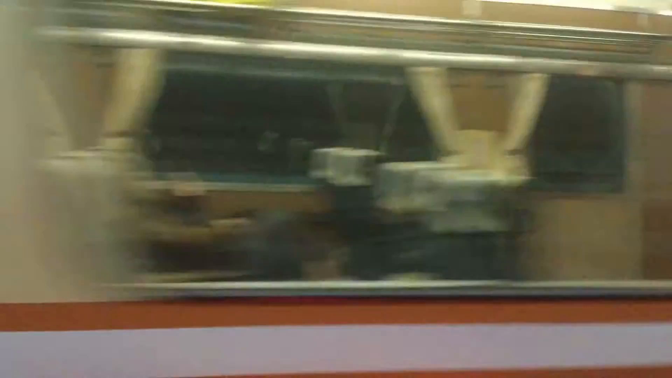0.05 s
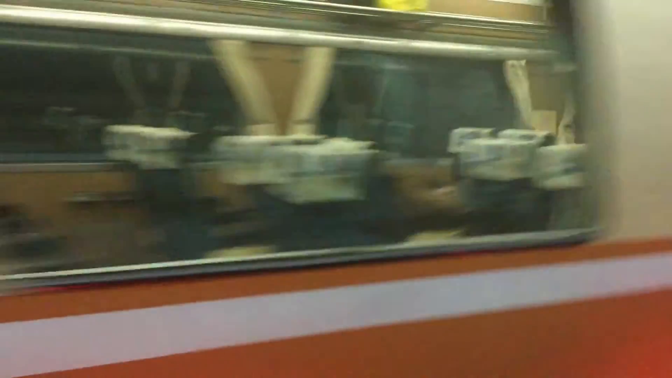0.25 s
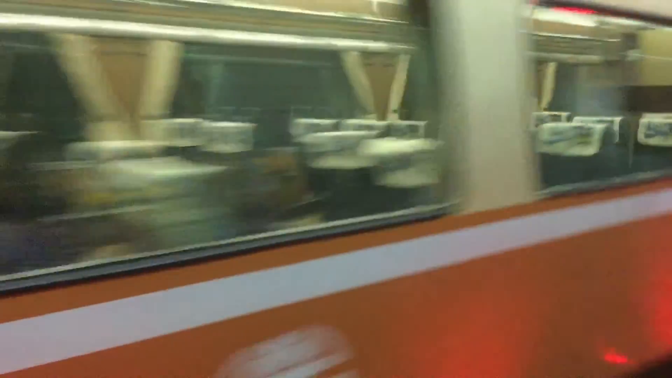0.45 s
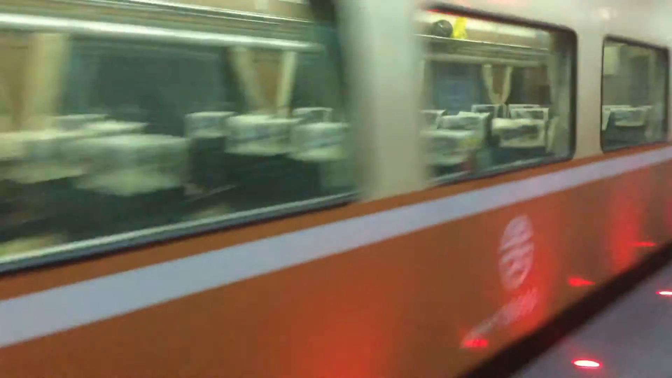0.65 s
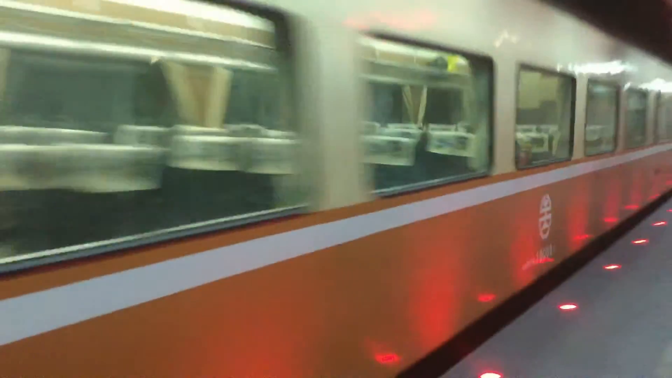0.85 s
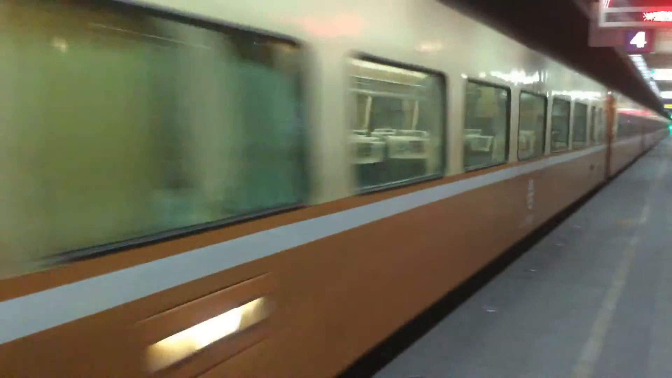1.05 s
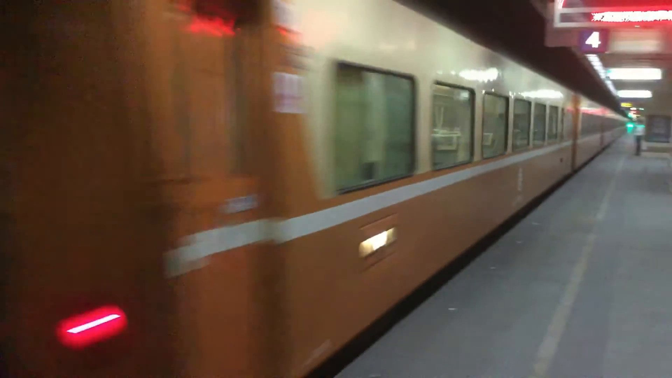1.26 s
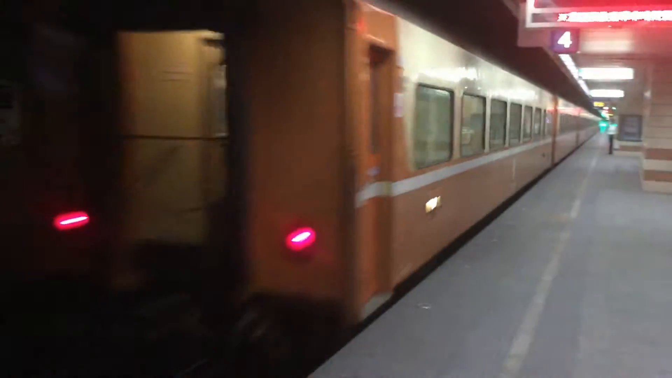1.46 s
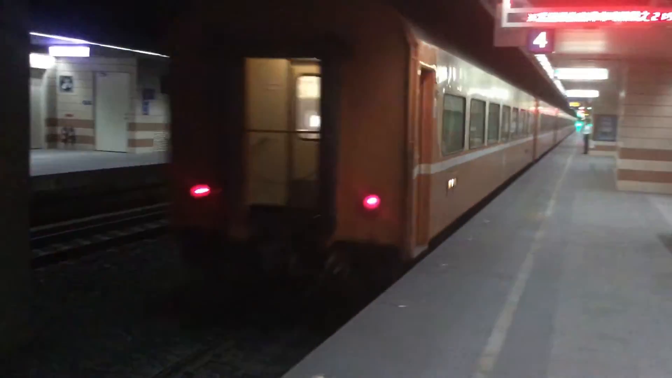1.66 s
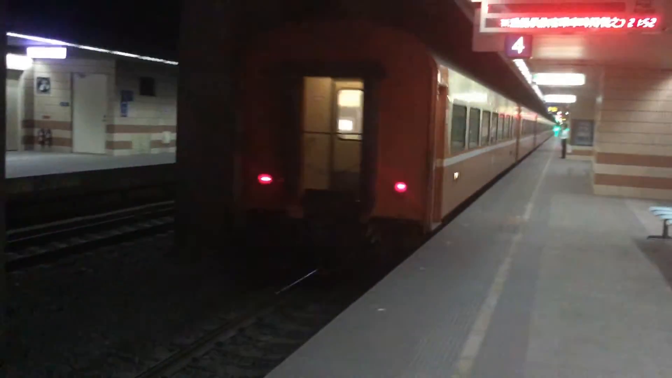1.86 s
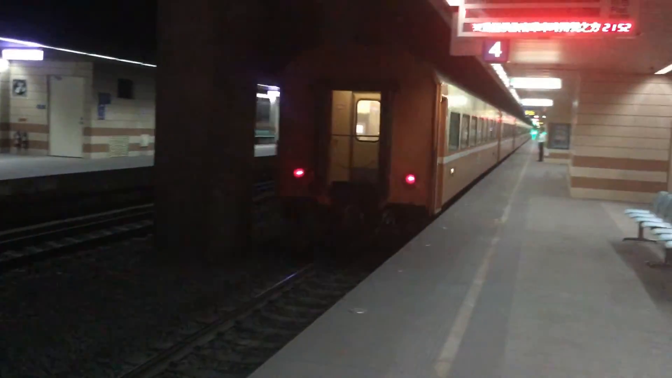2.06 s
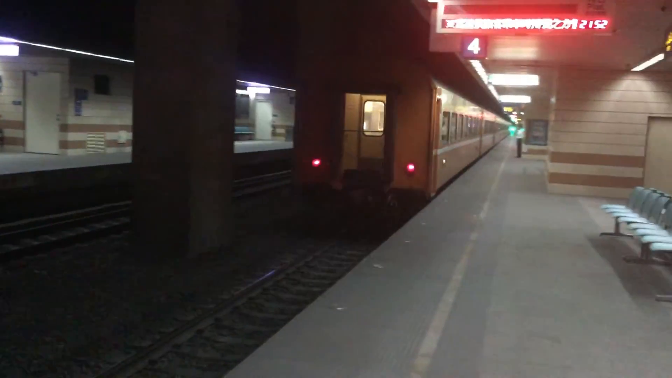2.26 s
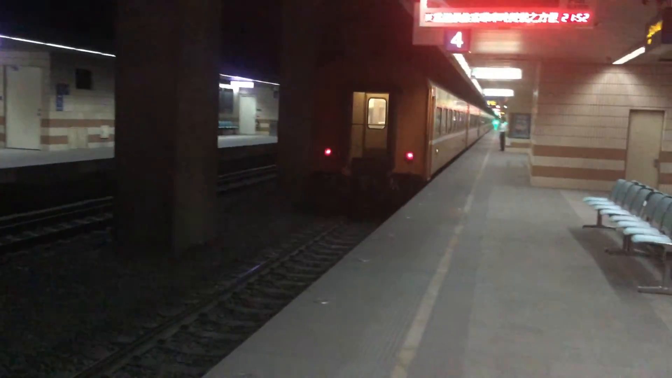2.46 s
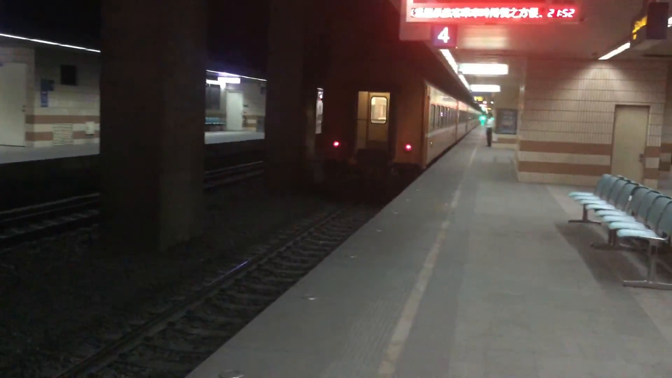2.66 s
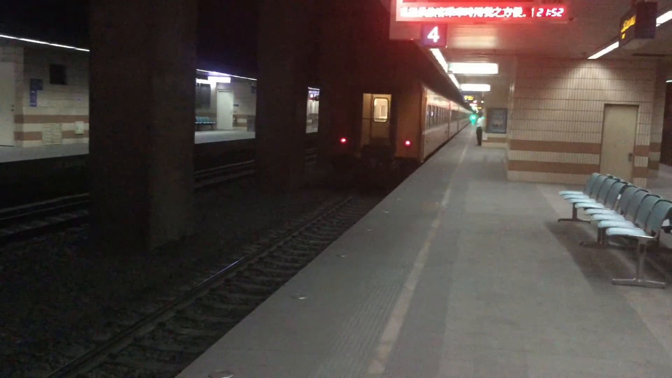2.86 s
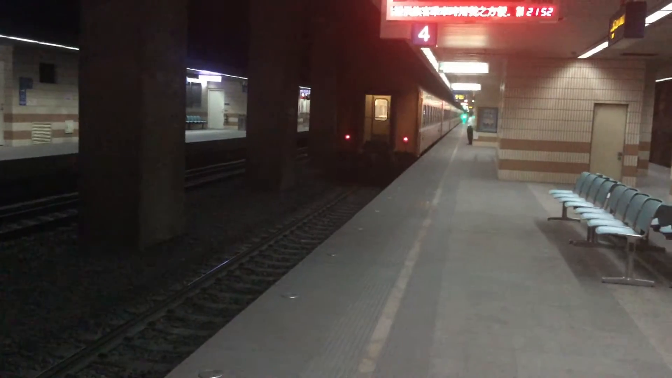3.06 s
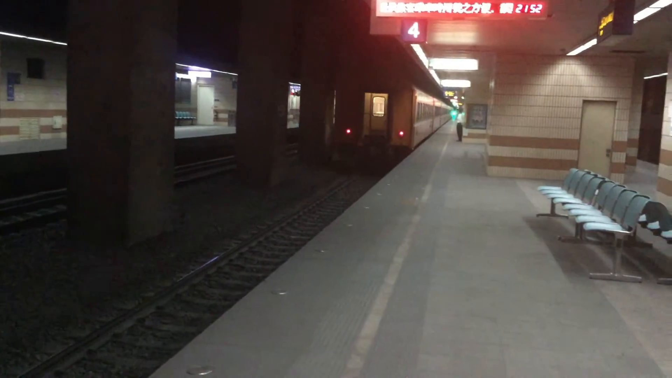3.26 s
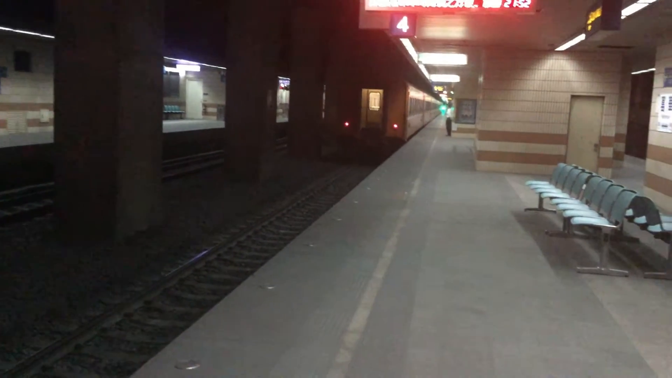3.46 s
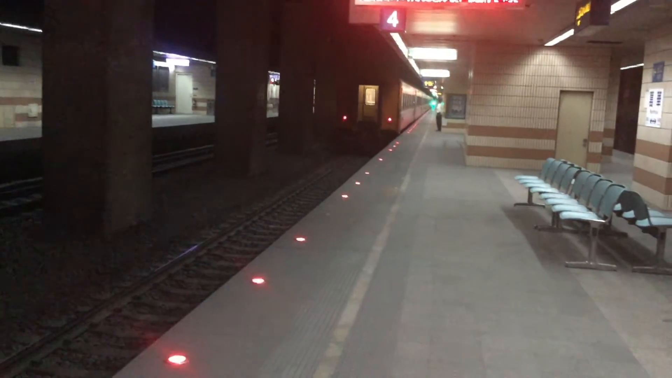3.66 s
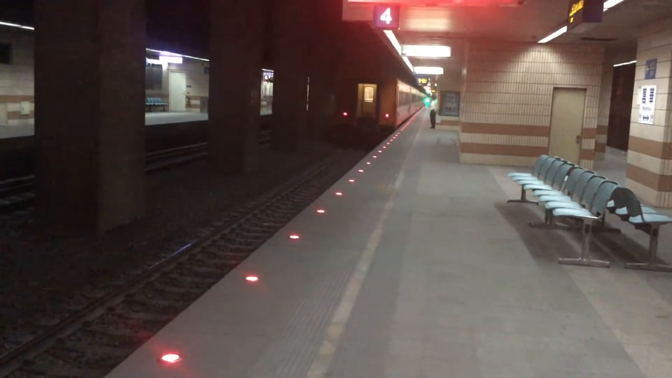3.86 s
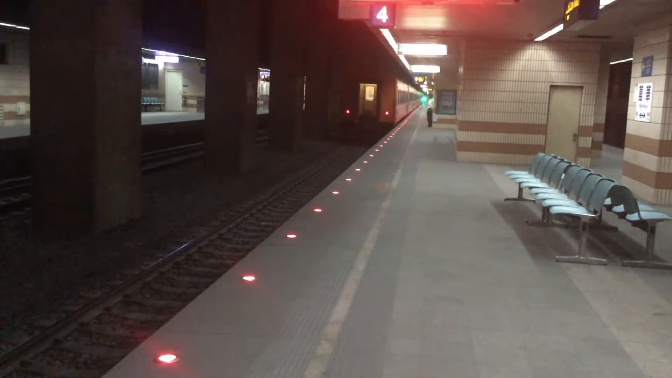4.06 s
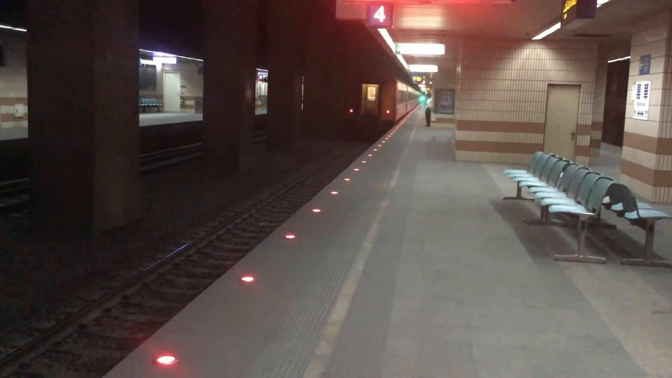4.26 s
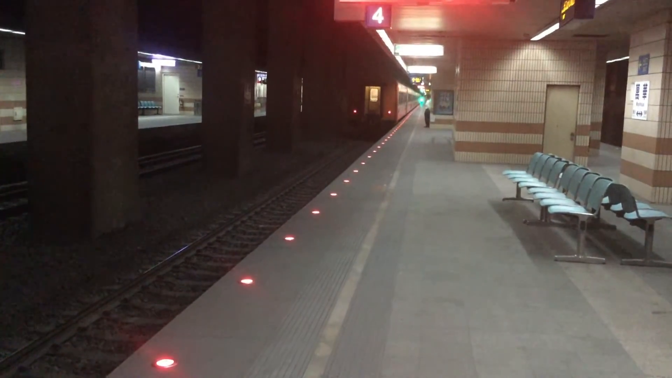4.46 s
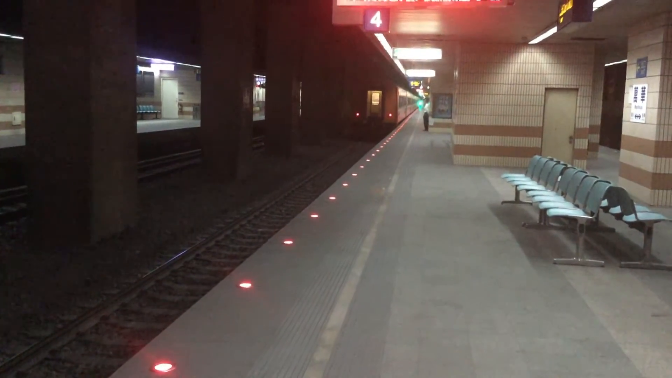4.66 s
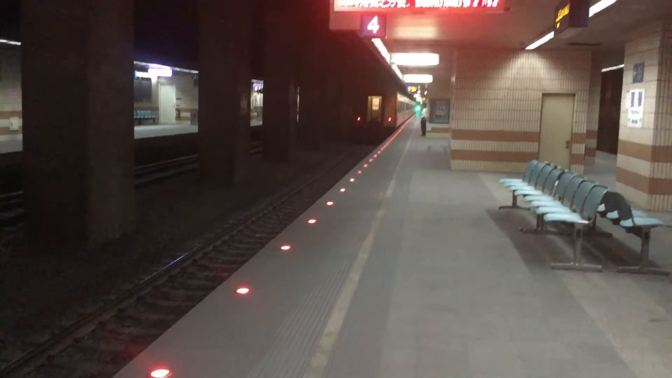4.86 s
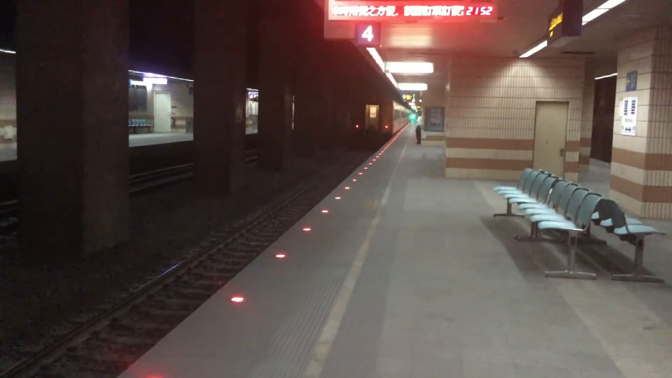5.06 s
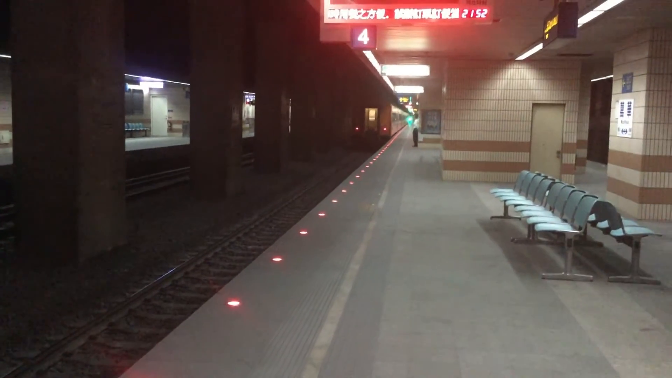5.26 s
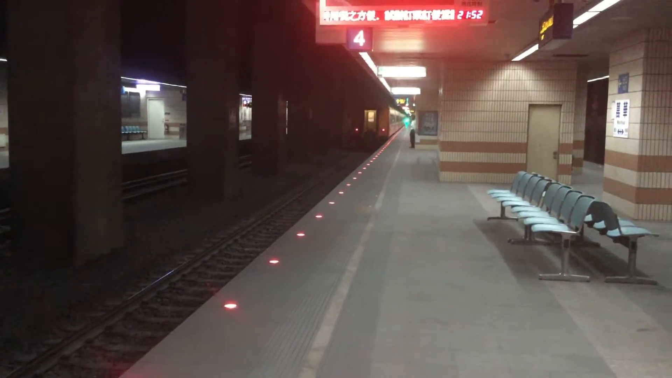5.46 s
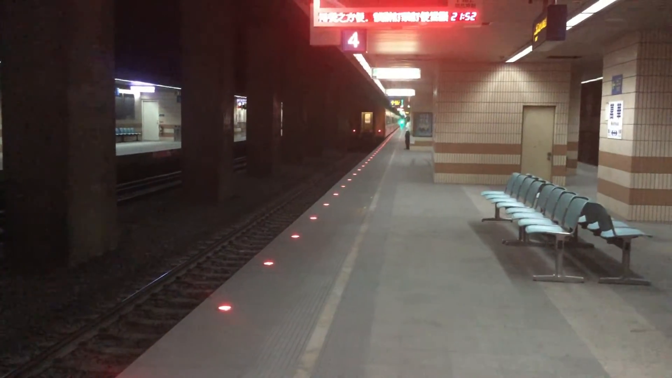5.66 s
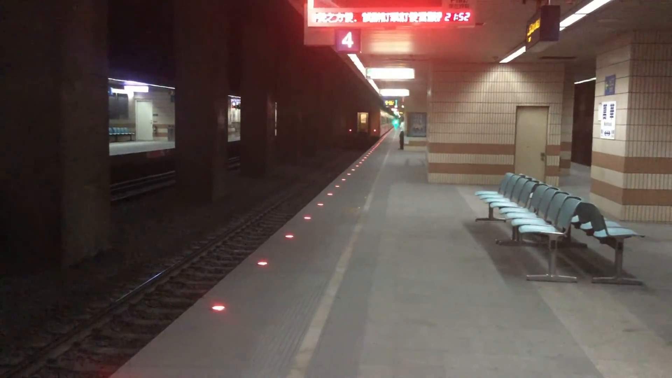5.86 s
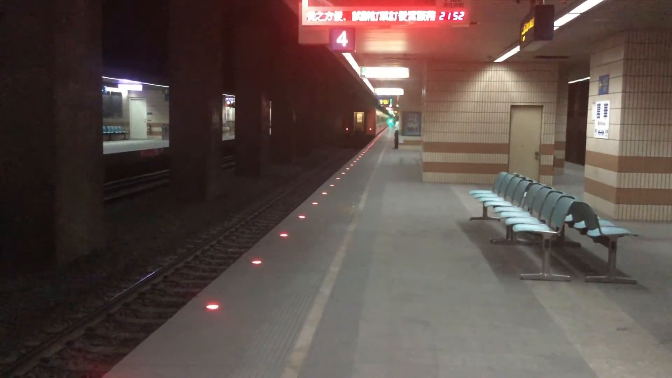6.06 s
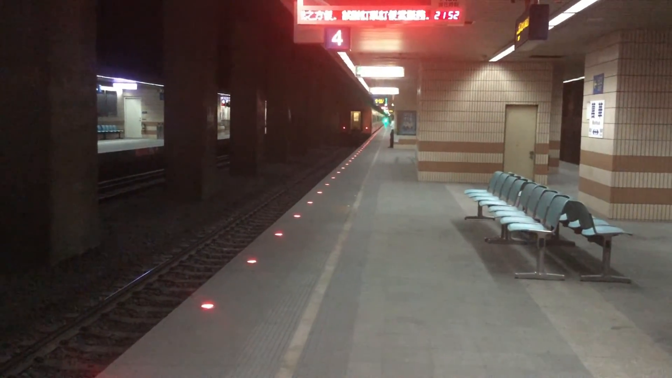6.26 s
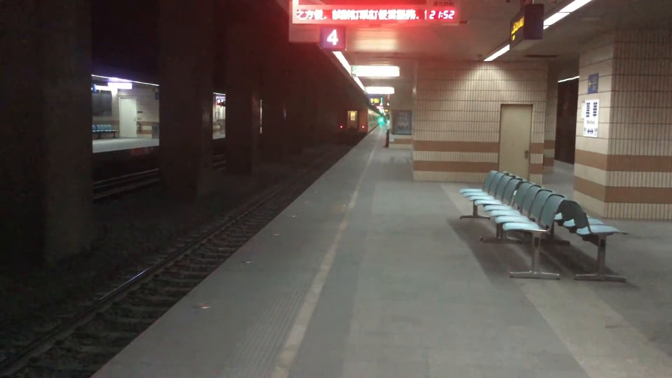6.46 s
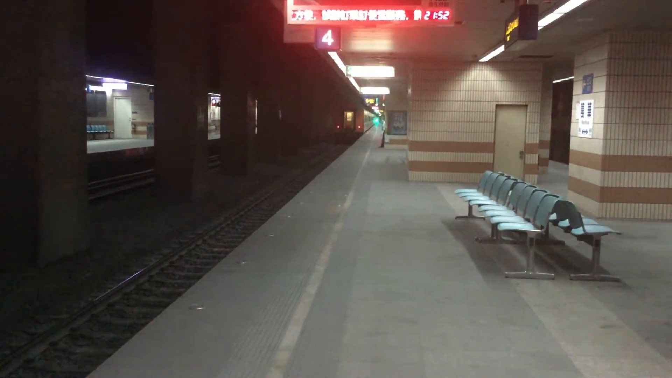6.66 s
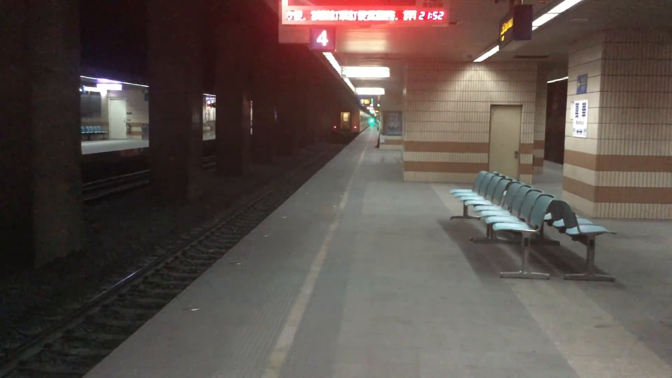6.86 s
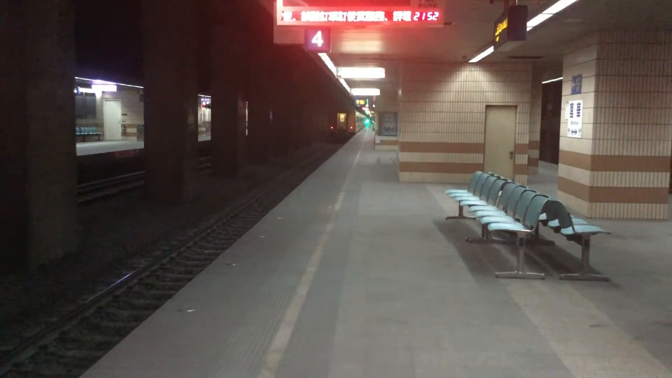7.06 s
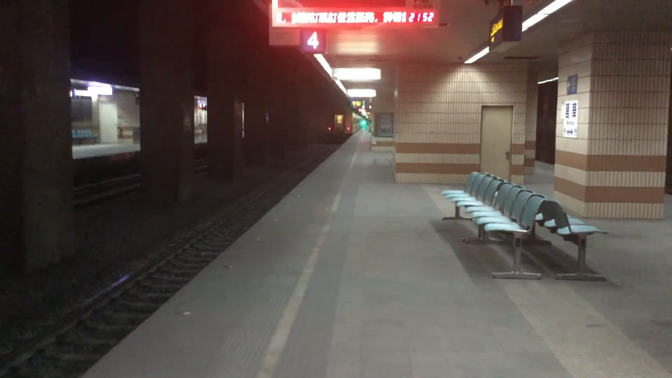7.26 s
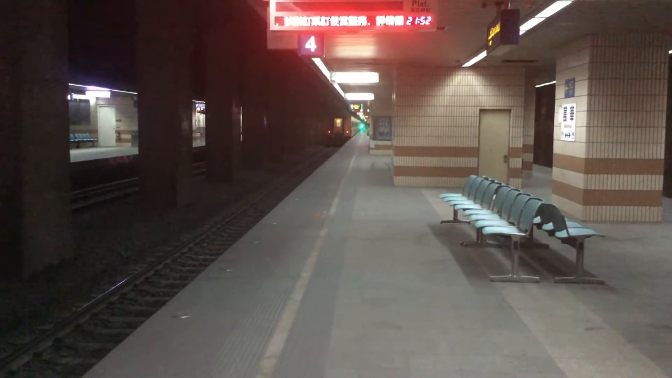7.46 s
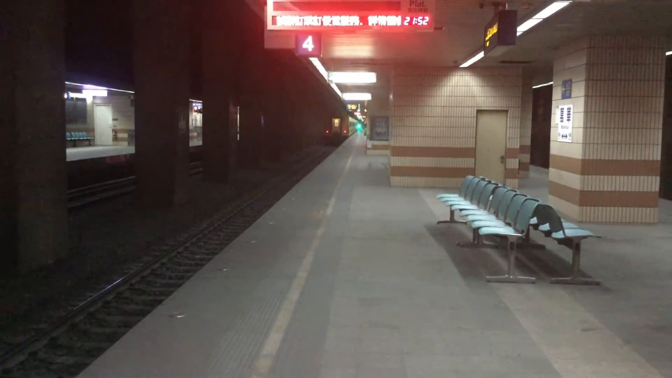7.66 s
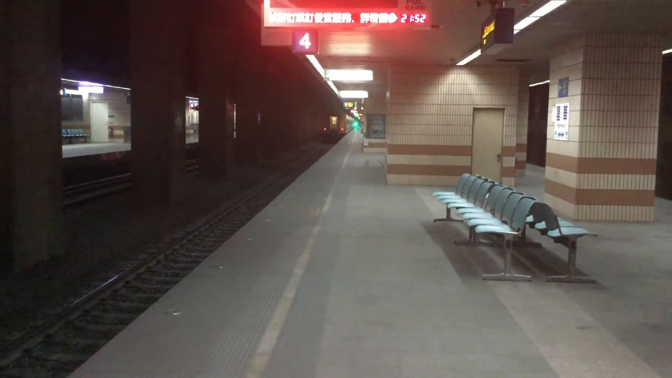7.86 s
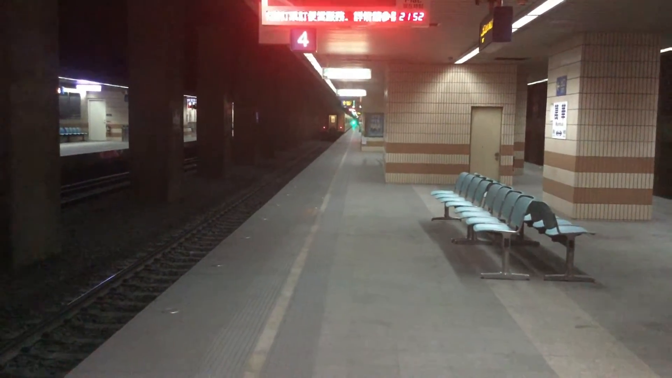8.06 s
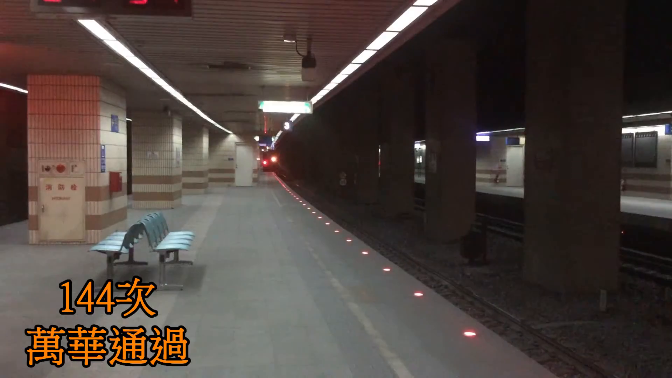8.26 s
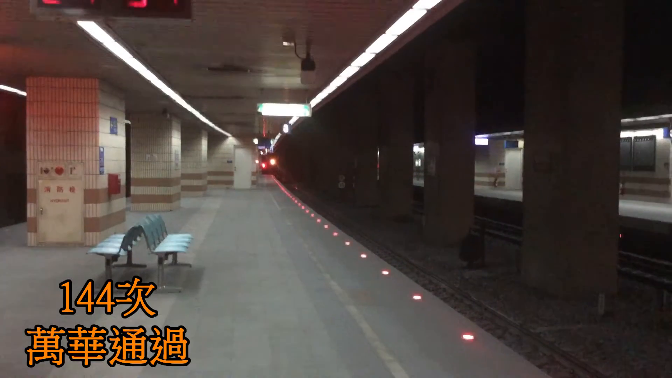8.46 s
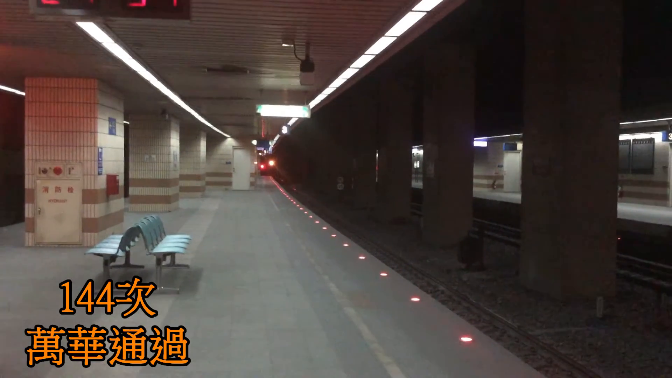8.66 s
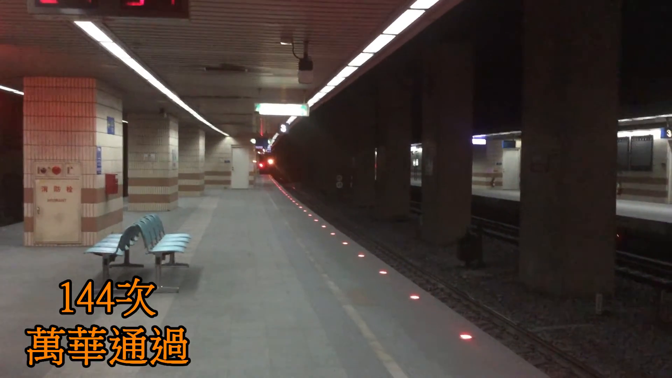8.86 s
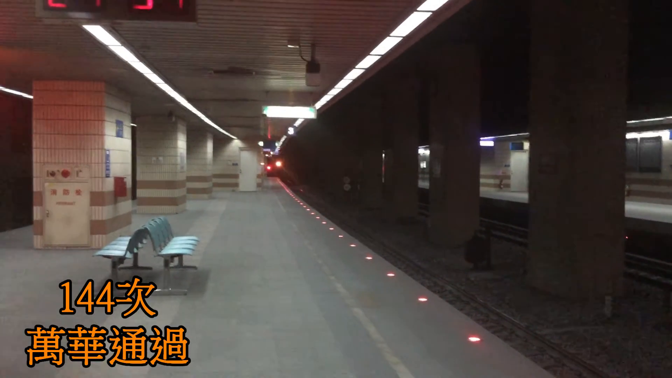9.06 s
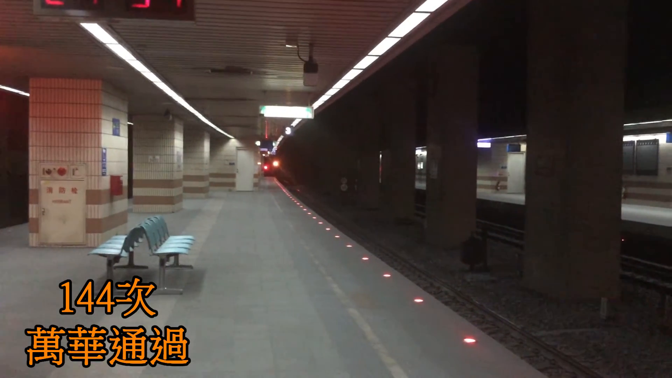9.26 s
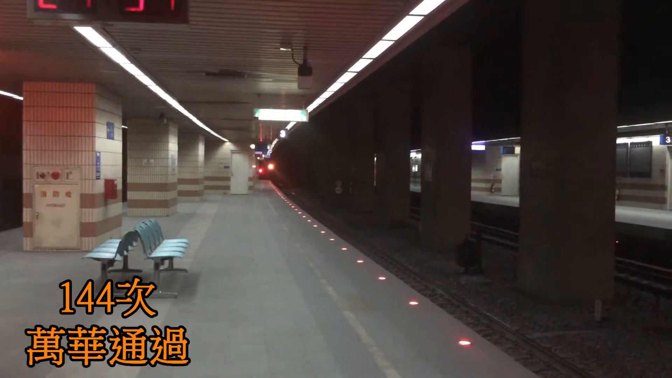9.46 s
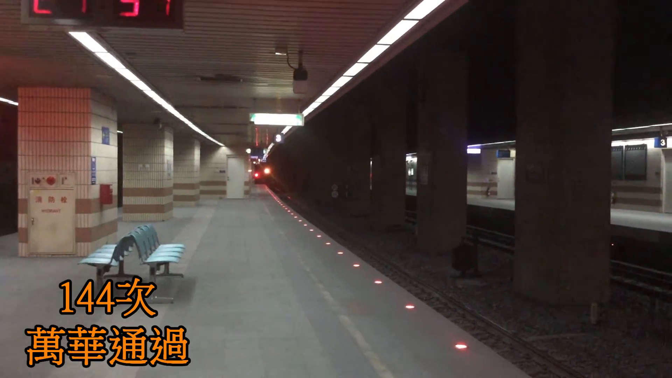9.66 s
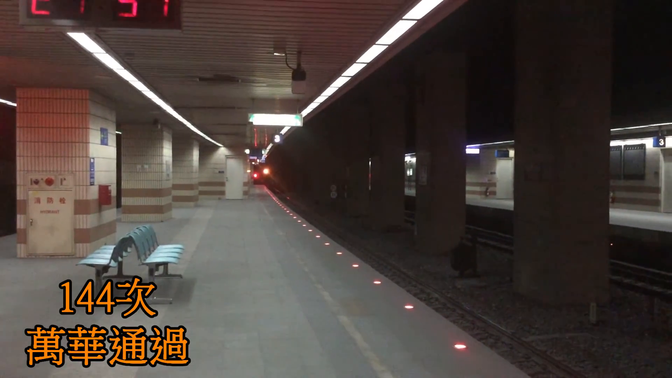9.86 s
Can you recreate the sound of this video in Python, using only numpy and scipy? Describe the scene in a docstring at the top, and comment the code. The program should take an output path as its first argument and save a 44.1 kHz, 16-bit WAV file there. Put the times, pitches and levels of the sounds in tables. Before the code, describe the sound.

A passenger train roars and rings past an underground platform in buffeting wind, recedes, cuts off, then a far train rumbles and clashes over a rail joint.

```python
"""A roaring, ringing train rushes along an underground platform and recedes into the tunnel, in gusts of wind.
Shaped noises make its roar, hiss, wheel tones and the boom of the hall; gusts and thumps of air hit the microphone.
That sound stops at once. After a moment of near silence comes a far train: a dull rumble, a hum and a roar,
then wheels clashing over a rail joint, made of thuds and bursts of noise that die away.
Faint squeaks, spits of hiss, thin high tones and quiet air lie behind."""
import sys
import numpy as np
from scipy import signal
from scipy.fft import irfft, next_fast_len
from scipy.io import wavfile
from scipy.ndimage import uniform_filter1d, map_coordinates

SR = 44100
rng = np.random.default_rng(int(sys.argv[2]) if len(sys.argv) > 2 else 0)


def bounce(signal):
    """Save signal as a 16-bit WAV file at the path given by the first command-line argument."""
    frames = np.transpose(np.atleast_2d(signal))
    limited = np.clip(frames, -1, 1)
    pcm = np.round(limited * 32767).astype(np.int16)
    wavfile.write(sys.argv[1], SR, pcm)


N = 437451
TIME = np.arange(N) / SR
LEAVE_END_S, FAR_START_S = 8.217, 8.263
# In all spectra the levels are relative. A "length" is two standard deviations of a bell-shaped swell.
# A "width" is how far from its centre a resonance has dropped to half its gain.


def rolling(jolt_db=0.65, tunnel_s=7.06, tunnel_fall_db_per_s=1.5):
    """Rough rails shake track and wheels; the tunnel mouth finally swallows the sound."""
    jolts = jolt_db * walk(32)  # shared by all parts: they have the same rough contact
    swallowed_db = tunnel_fall_db_per_s * np.maximum(TIME - tunnel_s, 0)
    return (reflect(roar() + hiss()) + wheels()) * undb(jolts - swallowed_db)


# Colour of the leaving train's roar: (f/Hz, level/dB)
ROAR_SPECTRUM = [(120, -30), (300, -6), (390, -6.5), (460, 0.7), (520, -3), (600, 1.1), (690, .3),
                 (790, 0.4), (930, -6.5), (1100, -4.5), (1500, -12), (2100, -13.5), (2800, -14.5),
                 (4000, -20), (6000, -51), (16000, -53)]


def roar(flutter_db=0.6):
    """Rail roughness drives a broad roar, made of coloured noise."""
    level_db = passing(top_db=-30.0, top_s=2.17, rise_db_per_s=0.3, fall_db=8.5)
    return noise(ROAR_SPECTRUM) * undb(level_db + flutter_db * walk(15))


# Colour of the leaving train's hiss: (f/Hz, level/dB)
HISS_SPECTRUM = [(1500, 1), (3400, 2), (3950, 2.5), (4350, 1.5), (4800, 1), (5300, -0.5), (5900, -3.5),
                 (6900, -4.5), (7700, -8.5), (8400, -6.5), (9000, -8.5), (9550, -7.5), (10600, -11),
                 (12200, -8.5), (14300, -15.5), (15700, -18)]


def hiss(flutter_db=0.58):
    """The bright part of the rolling sound, made of coloured noise."""
    level_db = passing(top_db=-35, top_s=2, rise_db_per_s=0.9, fall_db=9)
    return noise(HISS_SPECTRUM) * undb(level_db + flutter_db * walk(18))


# The tones at which the wheels ring: (f/Hz, width/Hz, level close by/dB, level far off/dB)
WHEEL_MODES = [(1040, 50, -14, -11), (1178, 74, -2.7, -2.4), (1540, 130, -24, -9.5), (1752, 94, .5, -1.2),
               (2130, 70, -15, -17), (2395, 104, -1.6, -4.8), (2800, 100, -12, -11.5),
               (3080, 108, -4.3, -9.8), (3890, 170, -12, -13), (4400, 120, -28, -16.5),
               (4850, 260, -15, -16), (5320, 90, -17, -27), (6630, 80, -21, -30), (8200, 120, -25, -33)]
# How the wheel tones sink as the last axles go by: (t/s, pitch ratio)
DOPPLER_SHIFT = [(0, 1.016), (1.0, 1.016), (1.7, 1.0), (3, 0.994), (8.2, 0.992)]


def wheels(flutter_db=1.0, grind_db=1.88, wander=0.01, near_ring_db=0.5, far_ring_db=-3.5,
           near_wash_db=-5.5, far_wash_db=-5):
    """Randomly driven wheel modes ring; their balance shifts and a broad wash gains on them as the train goes."""
    farness = np.clip((TIME - 2) / 5, 0, 1)  # 0 close by, 1 far off
    ring, power = 0, 0
    for hz, width, near_db, far_db in WHEEL_MODES:
        gain = undb(near_db + farness * (far_db - near_db)) * np.sqrt(width)
        # the pitch wanders by a share of itself as different wheels take the lead
        position = np.cumsum(1 + wander * walk(4))
        mode = np.interp(position, np.arange(N), resonance(hz, width))
        flutter = undb(flutter_db * walk(14) + grind_db * walk(70))
        ring = ring + gain * steady(mode) * flutter
        power = power + gain ** 2
    ring = ring / np.sqrt(power)

    # reading the ringing faster or slower shifts its pitch
    position = np.cumsum(curves(DOPPLER_SHIFT)[0])
    ring = map_coordinates(ring, [position], order=3, mode="mirror")
    ring_db = near_ring_db + farness * (far_ring_db - near_ring_db)
    wash_db = near_wash_db + farness * (far_wash_db - near_wash_db)
    wash = resonance(1450, 820) * undb(wash_db)
    level_db = passing(top_db=-34.5, top_s=1.33, rise_db_per_s=2.5, fall_db=4)
    return (ring * undb(ring_db) + wash) * undb(level_db)


# Single wheels singing out on one mode: (t/s, length/s, f/Hz, width/Hz, level/dB)
SINGING_WHEELS = [(.93, .17, 3190, 60, -43), (1.7, .36, 3100, 45, -42.5), (1.75, .4, 1780, 55, -45),
                  (4.0, .28, 1205, 30, -46.5), (4.85, .2, 1720, 45, -48), (5.35, .2, 1765, 45, -49),
                  (5.93, .16, 2375, 45, -49.5), (6.7, .5, 1750, 50, -50.5)]


def singing(flutter_db=0.5):
    """Now and then one wheel rings out with a rough edge: a swell of narrow noise."""
    out = 0
    for s, length, hz, width, db in SINGING_WHEELS:
        tone = steady(resonance(hz, width))
        out = out + undb(db + flutter_db * walk(45)) * swell(s, length) * tone
    return out


# Low resonances of the hall: (f/Hz, level/dB)
HALL_SPECTRUM = [(30, -39), (70, -32), (115, -3.5), (160, 0), (210, -2.5), (270, -0.5), (310, -5.5),
                 (380, -10.5), (600, -28.5), (2000, -72)]


def boom(throb_db=1.0):
    """The coaches' rumble throbs in the low resonances of the hall."""
    level_db = passing(top_db=-23.5, top_s=1.23, rise_db_per_s=1.5, fall_db=9.5)
    return steady(noise(HALL_SPECTRUM)) * undb(level_db + throb_db * walk(22))


# Colour of the wind on the microphone: (f/Hz, level/dB)
WIND_SPECTRUM = [(20, -44), (35, -33), (50, -6), (65, 4), (100, 2), (150, -7.5), (220, -12), (330, -20),
                 (500, -55), (1500, -69)]
# The strongest eddies that strike the microphone: (t/s, peak level/dB, f/Hz)
STRONG_EDDIES = [(.11, -12, 130), (.21, -16, 167), (0.28, -14.5, 101), (0.67, -14, 150), (.721, -17.5, 202),
                 (0.972, -14, 145), (0.999, -13, 237), (1.114, -16, 166), (1.161, -16.5, 195),
                 (1.411, -13, 156), (1.446, -14, 156), (1.486, -14, 164), (1.602, -15, 157),
                 (1.645, -15, 120), (1.676, -21, 110), (1.715, -19, 188), (1.829, -20, 170),
                 (1.929, -20, 200), (1.977, -14.5, 137), (2.078, -21, 170), (2.115, -21, 110),
                 (2.161, -15.5, 248), (2.248, -21, 233), (2.313, -21, 238), (2.341, -21, 200),
                 (2.457, -20, 205), (2.487, -17, 180), (2.55, -20, 180), (2.623, -17.5, 107),
                 (2.795, -20, 233), (2.84, -22, 131), (3.045, -23, 139), (3.114, -26, 165),
                 (3.458, -17.5, 160), (3.513, -19, 207), (3.583, -11.5, 174), (3.656, -17, 164),
                 (3.677, -17.5, 173), (3.7, -20, 95), (3.988, -20, 117), (4.139, -23, 230),
                 (4.155, -18.5, 190), (4.178, -18, 228), (4.188, -17.5, 181), (4.348, -21, 164),
                 (4.413, -16.5, 178), (4.523, -16, 125), (4.552, -19, 86), (4.968, -23, 157),
                 (5.052, -19, 200), (5.065, -15.5, 217), (5.1, -21, 165), (5.205, -16.5, 220),
                 (5.224, -22.5, 300), (5.265, -19, 94.5), (5.334, -14.5, 107), (5.357, -17, 99),
                 (5.38, -17, 130), (5.394, -15.5, 232), (5.426, -23.5, 108), (5.926, -19.5, 203),
                 (5.955, -22, 110), (6.0, -17.5, 130), (6.038, -20.5, 160), (6.052, -18, 310),
                 (6.218, -29, 170), (6.234, -25, 136), (6.341, -26, 114), (6.497, -23, 103),
                 (6.546, -26, 130), (6.655, -22, 140), (6.668, -21, 80), (6.69, -22.5, 127),
                 (6.977, -24.5, 134), (7.431, -27, 94), (7.544, -31, 133), (8.025, -36, 96),
                 (8.105, -32, 105)]


def wake(gust_db=2.0, cycles=0.46, churn_db=-18, churn_s=0.012, sweep=0.53):
    """Turbulent air flutters on the microphone; each eddy thumps, dips the flutter and churns briefly."""
    strength = wind_strength()
    out = steady(noise(WIND_SPECTRUM)) * strength * undb(gust_db * walk(40))
    churn = resonance(255, 117)
    blows = chance_eddies(strength) + list(STRONG_EDDIES)
    turns = rng.random(len(blows))  # where in its cycle each thump starts
    for (s, db, hz), turn in zip(blows, turns):
        near = slice(*np.searchsorted(TIME, [s - .05, s + .05]))
        t = TIME[near] - s
        envelope = np.exp(.5 - np.hypot(t * hz / cycles, .5))
        thump = envelope * np.cos(2 * np.pi * (t * hz + turn))
        contact = np.exp(-(t / churn_s) ** 2)
        # higher-pitched eddies churn more
        spray = churn[near] * contact * hz / 200
        flutter = out[near] * (1 - sweep * contact)
        out[near] = flutter + undb(db) * thump + undb(db + churn_db) * spray
    return out


# Gusts in the wake: (t/s, length/s, level/dB)
WAKE_GUSTS = [(.25, .15, -31), (1.37, 0.15, -32), (1.66, .08, -25), (2.08, 0.065, -29.5), (2.48, .06, -33),
              (2.62, 0.086, -27.5), (2.82, .04, -30), (3.602, 0.56, -33), (3.993, 0.063, -30),
              (4.18, 0.045, -30), (4.407, 0.1, -31.5), (4.53, 0.057, -24), (4.665, 0.073, -33.5),
              (5.078, 0.17, -33), (5.3, 0.18, -29.5), (5.555, 0.064, -41), (5.686, 0.046, -35),
              (5.997, 0.13, -37), (6.297, 0.45, -38), (6.5, 0.16, -38), (6.669, 0.057, -33),
              (7.56, 0.066, -38), (8.08, 0.27, -40)]


def wind_strength(slip_db=-30.5, slip_fall_db_per_s=25, draught_db=-37, draught_fall_db_per_s=1.65):
    """A slipstream that drops behind the tail, a slowly dying draught and gusts add up in power."""
    behind_s = np.maximum(TIME - 1.85, 0)  # time since the slipstream ended
    slip = undb(slip_db - slip_fall_db_per_s * behind_s)
    draught = undb(draught_db - draught_fall_db_per_s * behind_s)
    return np.sqrt(slip ** 2 + draught ** 2 + gusting(WAKE_GUSTS) ** 2)


def chance_eddies(strength, count=110, over_db=5, scatter_db=5, typical_hz=143, scatter_oct=0.31):
    """Rows (t/s, peak level/dB, f/Hz) of random lesser eddies, which follow the strength of the wind."""
    times = rng.random(count) * LEAVE_END_S
    size, pitch = rng.standard_normal((count, 2)).T
    wind_db = 20 * np.log10(np.interp(times, TIME, strength))
    peak_db = wind_db + over_db + scatter_db * np.tanh(size)
    hz = typical_hz * 2 ** (scatter_oct * pitch)
    return list(zip(times, peak_db, hz))


# Colour of the far train's rumble: (f/Hz, level/dB)
FAR_RUMBLE_SPECTRUM = [(20, -34), (45, -11), (90, -5.5), (130, -6), (180, -3), (215, -.5), (270, -3),
                       (320, -9), (400, -13), (900, -57)]
# Colour of the far train's roar: (f/Hz, level/dB)
FAR_ROAR_SPECTRUM = [(200, -29), (400, -6), (520, 4), (800, 4), (1000, 0.5), (1400, -4.5), (1800, -8),
                     (2300, -8.5), (2700, -11.5), (4000, -14), (5200, -18.5), (7000, -31.5), (9000, -41),
                     (15500, -55)]
# How the far roar ebbs and returns: (t/s, level change/dB)
FAR_ROAR_EBB = [(8.26, 1.3), (8.42, 0.5), (8.72, -1), (9.0, 1.4), (9.92, 2.5)]


def far_train(rumble_db=-41.5, hum_db=-44.5, roar_db=-47, rise_db_per_s=0.4, throb_db=2.0, flutter_db=1.0):
    """Coloured noises make a dull roar over a slowly growing rumble and a beating hum of the hall."""
    growth_db = rise_db_per_s * np.maximum(TIME - FAR_START_S, 0)
    rumble = steady(noise(FAR_RUMBLE_SPECTRUM)) * undb(rumble_db + throb_db * walk(13))
    hum = steady(resonance(271.6, 18), 0.25) * undb(hum_db)
    far_roar_db = roar_db + curves(FAR_ROAR_EBB)[0] + flutter_db * walk(25)
    far_roar = noise(FAR_ROAR_SPECTRUM) * undb(far_roar_db)
    return (rumble + hum) * undb(growth_db) + far_roar


# Far wheels clashing over a rail joint: (t/s, level/dB, time to fall by 60 dB/s, level of the thud/dB)
JOINT_CLASHES = [(9.309, -29.5, .75, -30.5), (9.335, -35.5, 0.65, -28.5), (9.405, -35, .8, -33),
                 (9.485, -32, 1.3, -33), (9.555, -34.5, 1.1, -42), (9.695, -39, 1.3, -35)]
# Colour of the clashes: (f/Hz, level/dB)
CLASH_SPECTRUM = [(50, -16), (100, -8), (170, 5.5), (270, 11.5), (330, 8.5), (430, -1.5), (540, 1.5),
                  (750, 4), (1000, -2), (1500, -7.5), (2000, -7), (2380, -8), (2650, -19), (3000, -15),
                  (3500, -16.5), (5000, -21.5), (7000, -34.5), (12000, -58)]


def clashes(rise_s=0.010, rattle_db=0.5, clatter_db=1.5, thud_hz=190, thud_width=27, thud_t60=0.33):
    """Each far blow is a thud and a burst of noise that dies away in the hall, its bands clattering apart."""
    power, thud_power = 0, 0
    for s, db, t60, thud_db in JOINT_CLASHES:
        power = power + (undb(db) * dying(s, t60, rise_s)) ** 2
        thud_power = thud_power + (undb(thud_db) * dying(s, thud_t60, 2 * rise_s)) ** 2
    rest, clatter = noise(CLASH_SPECTRUM), 0
    # peel off one band after another from the bottom; each flutters on its own
    for edge_hz in (400, 800, 1600, 3200):
        low_pass = signal.butter(4, edge_hz, fs=SR, output="sos")
        band = signal.sosfiltfilt(low_pass, rest)
        rest = rest - band
        clatter = clatter + steady(band) * np.std(band) * undb(clatter_db * walk(45))
    bursts = unit(clatter + rest) * np.sqrt(power) * undb(rattle_db * walk(54))
    thuds = steady(resonance(thud_hz, thud_width)) * np.sqrt(thud_power)
    return bursts + thuds


# Puffs of air pushed ahead of the far train: (t/s, length/s, level/dB)
AIR_PUFFS = [(9.44, .03, -43), (9.56, .06, -43), (9.76, .1, -46), (9.91, .05, -39)]


def puffs():
    """Short swells of wind noise buffet the microphone."""
    return steady(noise(WIND_SPECTRUM)) * gusting(AIR_PUFFS)


# Brief wheel squeaks: (t/s, length/s, f/Hz, glide/Hz per s, level/dB)
WHEEL_SQUEAKS = [(7.97, .03, 8300, 0, -62), (7.9, .06, 12150, 0, -64), (8.945, .028, 1475, 3000, -50),
                 (8.99, .022, 1490, 0, -53)]


def squeaks(waver=0.0182):
    """A flange touches the rail and one wheel mode sings for a moment, its pitch unsteady."""
    out = 0
    for s, length, hz, glide, db in WHEEL_SQUEAKS:
        pitch = hz * (1 + waver * walk(200)) + glide * (TIME - s)
        tone = unit(np.sin(2 * np.pi * np.cumsum(pitch) / SR))
        out = out + undb(db) * swell(s, length) * tone
    return out


# Faint, very high spits of hiss: (t/s, length/s, level/dB)
HISS_SPITS = [(.8, .2, -54), (4.68, .1, -56), (4.95, .07, -62), (5.8, .11, -57.5), (8.89, .04, -66.5),
              (9.55, .06, -71), (9.77, .08, -74)]


def spits(sputter_db=2.5):
    """Short, sputtering swells of very high hiss."""
    return gusting(HISS_SPITS) * resonance(14500, 1100) * undb(sputter_db * walk(60))


# Thin steady high tones: (f/Hz, width/Hz, level/dB)
WHISTLE_TONES = [(12060, 120, -65), (11405, 40, -80)]


def whistle(sizzle_db=-66):
    """Narrow bands of noise hang as thin high tones in a faint sizzle."""
    tones = sum(resonance(hz, width) * undb(db) for hz, width, db in WHISTLE_TONES)
    return tones + resonance(14300, 1800) * undb(sizzle_db)


# Colour of the quiet air in the station: (f/Hz, level/dB)
AIR_SPECTRUM = [(3000, 12), (7500, 1), (8700, 6), (11000, -1), (13000, -4), (15700, -5)]


def station_air(level_db=-65):
    """The quiet air of the station is a steady coloured noise."""
    return noise(AIR_SPECTRUM) * undb(level_db)


def idle_noise(level_db=-88):
    """A very faint noise, stronger towards the bass, runs throughout."""
    return shaped(lambda f: 1 / np.sqrt(f + 100)) * undb(level_db)


def passing(top_db, top_s, rise_db_per_s, fall_db, speed_m_s=20, reach_m=32.5):
    """Level in dB: creeps up until top_s, then nears a fall of fall_db per doubling of the tail's distance."""
    gone_m = speed_m_s * np.maximum(TIME - top_s, 0)
    still_to_rise_db = rise_db_per_s * np.maximum(top_s - TIME, 0)
    return top_db - still_to_rise_db - fall_db * np.log2(1 + gone_m / reach_m)


# Early echoes off platform, ceiling, pillars and coach sides: (lag/ms, gain)
EARLY_ECHOES = [(1.7, .13), (2.9, -.16), (4.3, .16), (7.1, .15), (11, -.14)]


def reflect(x, drift=.05):
    """Echo paths shift as the train moves, so narrow peaks wander through the noise."""
    out = x
    for lag_ms, gain in EARLY_ECHOES:
        lag = lag_ms * (1 + drift * walk(1.0)) * SR / 1000  # in samples
        out = out + gain * x.take(np.arange(N) - lag.astype(int), mode="wrap")
    return out


def swell(s, length):
    """A smooth rise and fall around time s."""
    return np.exp(-2 * ((TIME - s) / length) ** 2)


def gusting(table):
    """Strength of a row of gusts, which add up in power."""
    return np.sqrt(sum((undb(db) * swell(s, length)) ** 2 for s, length, db in table))


def dying(s, t60, rise_s):
    """A quick rise at time s, and an exponential decay by 60 dB in t60 seconds."""
    age = np.maximum(TIME - s, 0)
    return np.minimum(age / rise_s, 1) * np.exp(-np.log(1000) * age / t60)


def steady(x, span_s=.09):
    """Even out the slow swells of a noise and keep its fast flutter."""
    return x / np.sqrt(uniform_filter1d(x ** 2, int(span_s * SR)))


def noise(points):
    """Noise coloured by (f/Hz, level/dB) points."""
    hz, db = np.transpose(points)
    return shaped(lambda f: undb(np.interp(np.log(f), np.log(hz), db)))


def resonance(hz, width):
    """A randomly driven resonance: noise gathered around one frequency."""
    return shaped(lambda f: 1 / (1 + ((f - hz) / width) ** 2))


def shaped(gain_at):
    """Noise of rms 1 whose spectrum follows a function of frequency."""
    size = next_fast_len(N, True)
    freq = np.maximum(np.fft.rfftfreq(size, 1 / SR), 1)
    white = rng.standard_normal(2 * len(freq)).view(complex)
    return unit(irfft(white * gain_at(freq), size)[:N])


def walk(rate):
    """A smooth random curve of rms 1, changing about rate times a second."""
    knots = rng.standard_normal(int(N / SR * rate) + 4)
    step = 16  # computed at every 16th sample and held in between
    curve = map_coordinates(knots, [TIME[::step] * rate + 1], order=3)
    return np.repeat(unit(curve), step)[:N]


def curves(table):
    """Each column of a timed table, at every sample."""
    s, *columns = np.transpose(table)
    return [np.interp(TIME, s, c) for c in columns]


def unit(x):
    """Scale to rms 1."""
    return x / np.sqrt(np.mean(x ** 2))


def undb(db):
    """Decibels to gain."""
    return np.exp(np.asarray(db) * np.log(10) / 20)


def scene(fade_s=.0015):
    """The leaving train, a moment of near silence, the far train."""
    leaving = rolling() + singing() + boom() + wake() + whistle()
    distant = far_train() + clashes() + puffs() + station_air()
    stop = np.exp(-np.maximum(TIME - LEAVE_END_S, 0) / fade_s)
    trains = leaving * stop + distant * (TIME > FAR_START_S)
    mono = trains + squeaks() + spits() + idle_noise()
    return mono[None]


def record(dry, top_hz=15700):
    """A steep low-pass filter cuts the very top of the sound."""
    return signal.sosfilt(signal.ellip(10, .1, 80, top_hz, fs=SR, output="sos"), dry)


dry = scene()
out = record(dry)
bounce(out)
```